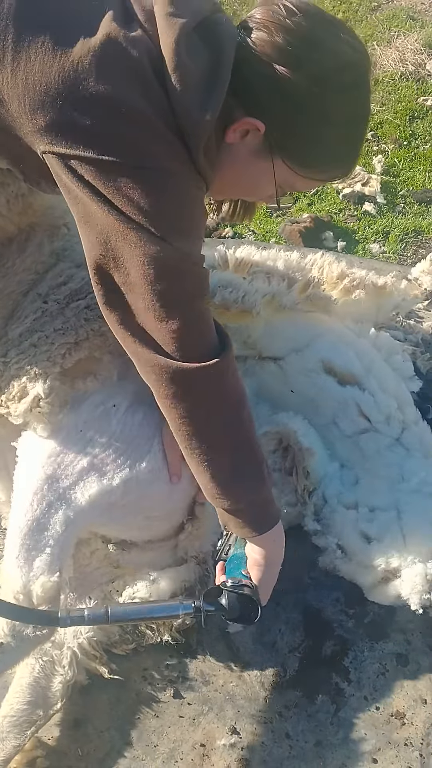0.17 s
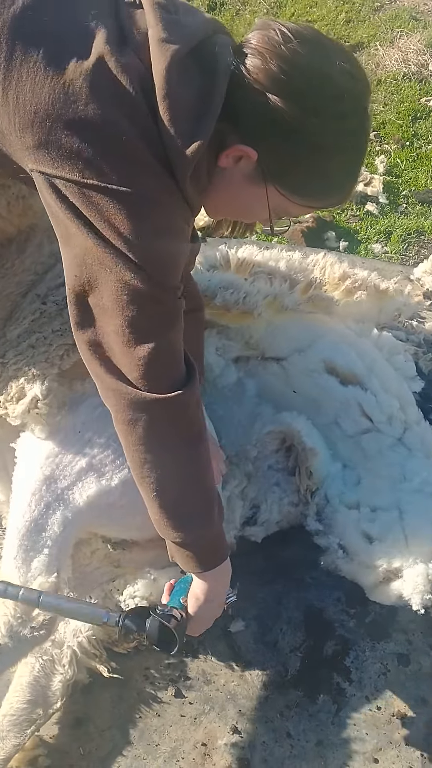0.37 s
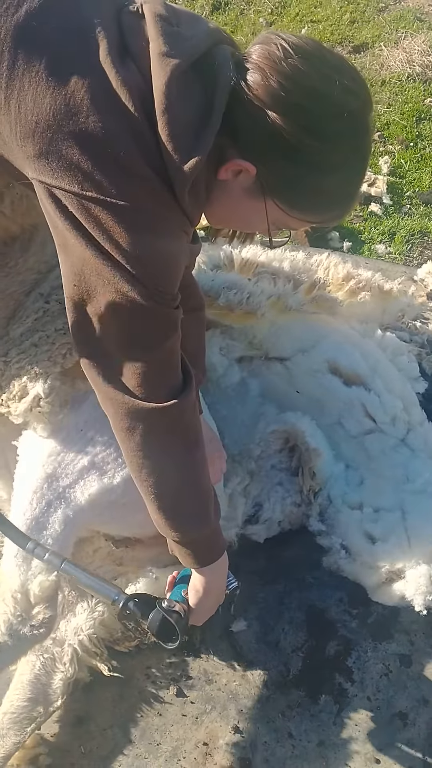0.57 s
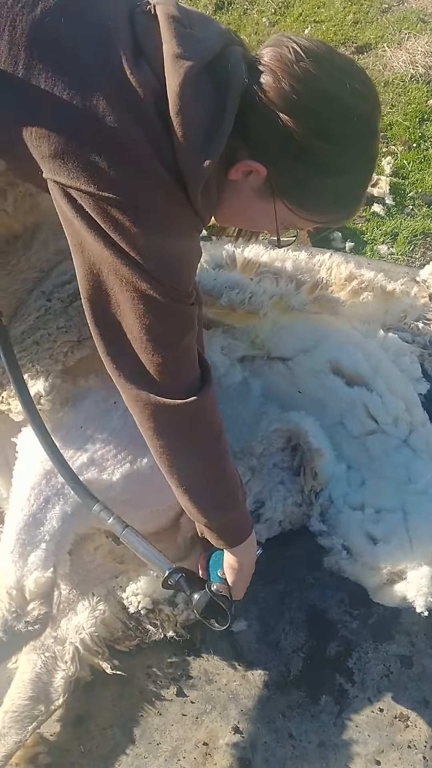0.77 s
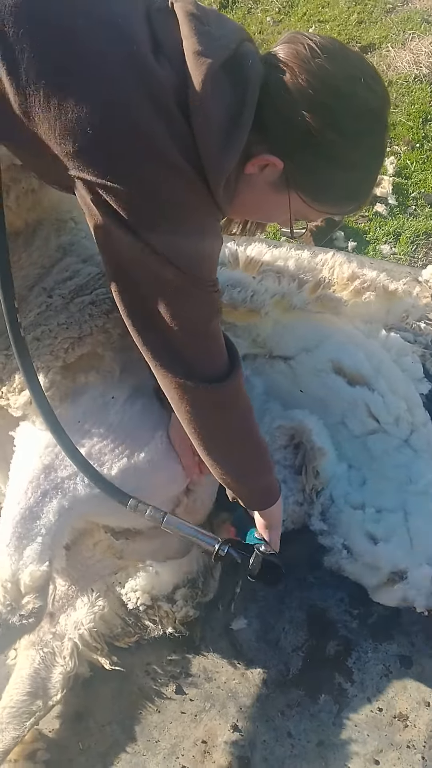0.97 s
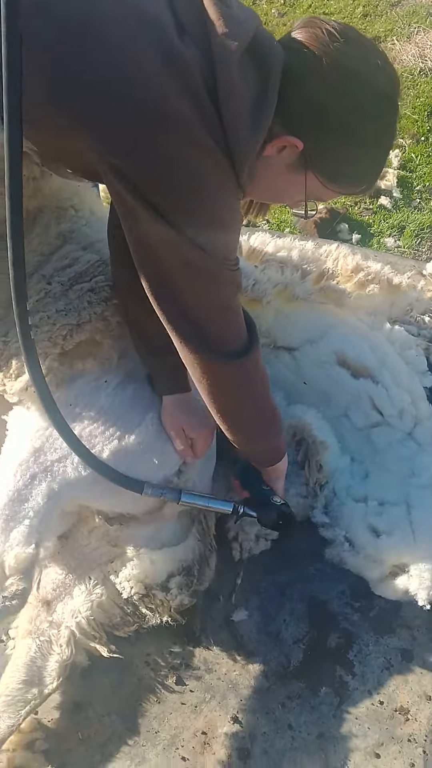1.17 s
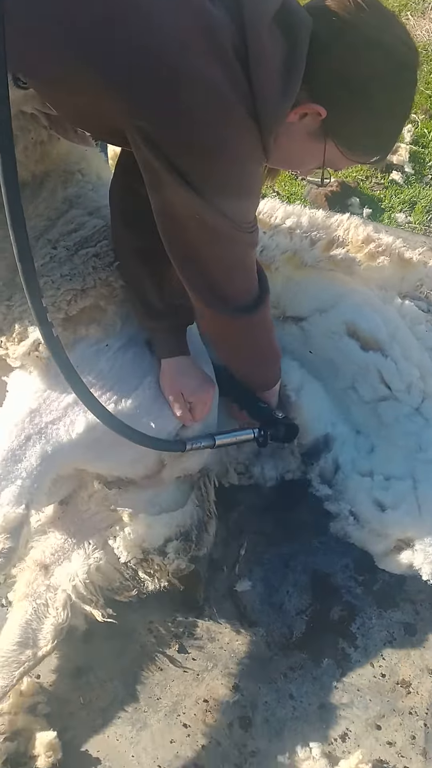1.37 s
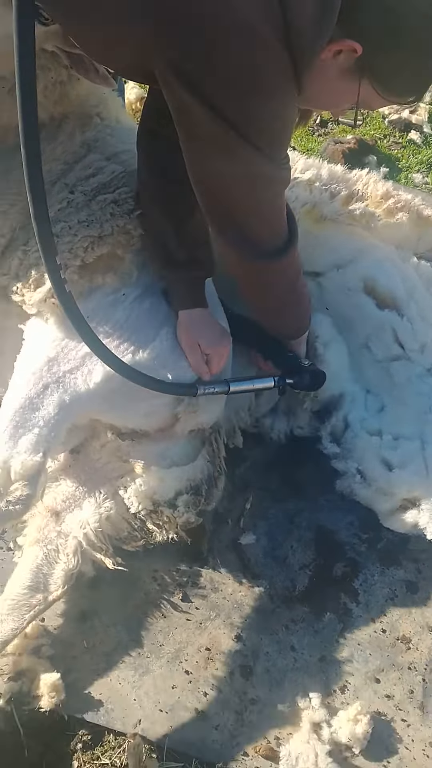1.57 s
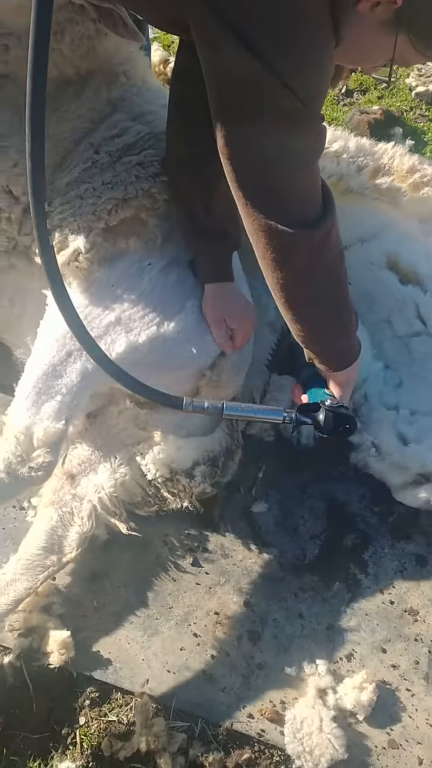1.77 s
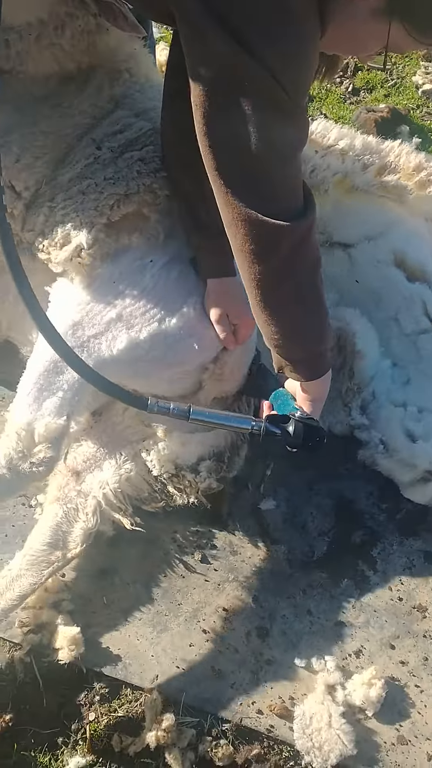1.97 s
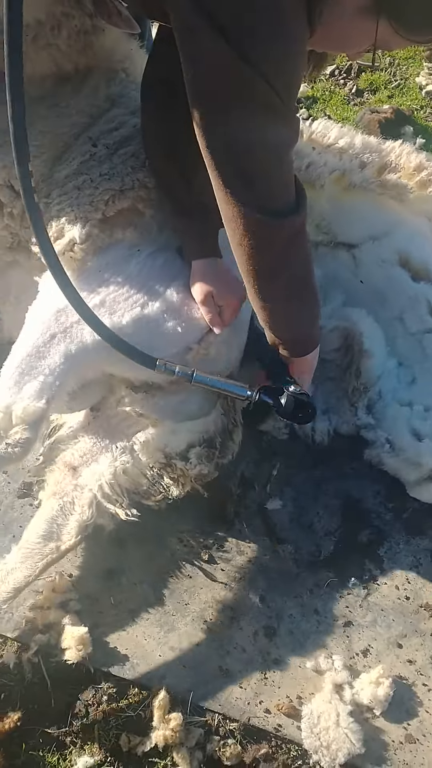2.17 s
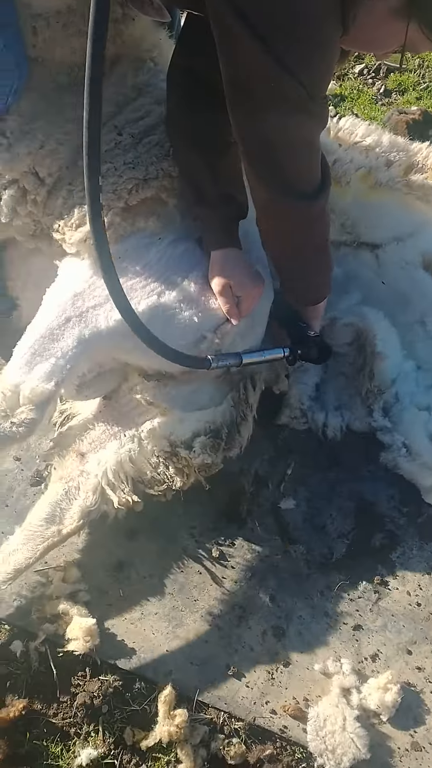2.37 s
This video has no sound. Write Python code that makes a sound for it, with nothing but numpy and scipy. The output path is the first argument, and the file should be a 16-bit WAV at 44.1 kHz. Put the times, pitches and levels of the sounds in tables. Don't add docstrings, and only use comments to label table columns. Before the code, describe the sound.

Close, bright metallic buzzing of sheep shears runs throughout, its rattle shifting as the hand moves; faint motor hum and distant small engine lie beneath, with soft low thuds mostly near the end.

```python
import sys
import numpy as np
from scipy import signal
from scipy.io import wavfile

SR = 44100
rng = np.random.default_rng(int(sys.argv[2]) if len(sys.argv) > 2 else 0)


def generate_wav(signal):
    frames = np.transpose(np.atleast_2d(signal))
    scaled = np.clip(frames, -1, 1) * 32767
    pcm = np.round(scaled).astype(np.int16)
    wavfile.write(sys.argv[1], SR, pcm)


def invert_db(level):
    return 10 ** (np.asarray(level, dtype=float) / 20)


N = 111132
SHAFT_HZ = 59.42
SOUND_M_PER_S = 343
BRIGHT_FROM_HZ = 4900


def rms_one(x):
    return x / np.sqrt(np.mean(x ** 2) + 1e-20)


def in_time(rows):
    s, *columns = np.transpose(rows)
    return [np.interp(np.arange(N) / SR, s, c) for c in columns]


def drift(rate_hz):
    r = np.exp(-80 * np.pi * rate_hz / SR)
    chance = rng.standard_normal(N // 40 + 2002)
    slow = signal.lfilter([1], [1, -2 * r, r * r], chance)[2000:]
    return np.interp(np.arange(N) / 40, np.arange(len(slow)), rms_one(slow))


def band(x, low, high):
    sos = signal.butter(2, [low, min(high, .45 * SR)], "band", fs=SR, output="sos")
    return signal.sosfilt(sos, x)


def high_pass(x, hz, run=signal.sosfilt):
    return run(signal.butter(2, hz, "high", fs=SR, output="sos"), x)


def banded_noise(spectrum, patchy_db, fast_db):
    hz, db = np.transpose(spectrum)
    edges = hz[0] * 2 ** np.arange(0, np.log2(hz[-1] / hz[0]) + .3, 1 / 3)
    white = rng.standard_normal((2, N))
    out = 0
    for k, (low, high) in enumerate(zip(edges, edges[1:])):
        level_db = np.interp(np.log(low * high) / 2, np.log(hz), db)
        flicker_db = patchy_db * drift(1.7) + fast_db * drift(36)
        out = out + invert_db(level_db + flicker_db) * band(white[k % 2], low, high)
    return rms_one(out)


def tone(turns, db, wobble_db):
    return np.sqrt(2) * invert_db(db + wobble_db * drift(3.5)) * np.cos(2 * np.pi * turns)


# (time [s], path to the engine shorter by [m])
SWAY = [(0, -.05), (.63, .24), (.9, .26), (1.35, .11), (1.65, -.18), (1.9, -.21), (2.15, -.09), (2.52, -.1)]
# (frequency [Hz], level [dB per Hz])
RUMBLE = [(25, -36), (60, -13), (110, -6), (200, -1), (450, -8), (850, -2.5), (1200, -7.5), (1700, -3),
          (2200, -13.5)]
# (multiple of the engine rate [1], level [dB])
ENGINE_ORDERS = [(2, -56), (3, -56.5), (4, -58.5), (5, -40), (6, -43.5), (7, -50), (8, -49), (10, -52),
                 (12, -59), (14, -64), (15, -62.5), (16, -64)]


def engine():
    engine_hz, first_firing_s = 37.83, .0045
    wall_echo_s, wall_echo_share = .0101, .45
    heard_s = np.arange(N) / SR + in_time(SWAY)[0] / SOUND_M_PER_S
    turns = engine_hz * (heard_s - first_firing_s)
    out = invert_db(-41.5) * banded_noise(RUMBLE, patchy_db=1.3, fast_db=1.2)
    for k, db in ENGINE_ORDERS:
        echo = 1 + wall_echo_share * np.exp(-2j * np.pi * k * engine_hz * wall_echo_s)
        out = out - tone(k * turns + np.angle(echo) / (2 * np.pi), db, wobble_db=1.3)
    return out


# (time [s], decay [s], level [dB], first pitch [Hz])
BUMPS = [
    (0.817, 0.034, -44, 115),
    (1.0, 0.027, -55, 95),
    (1.893, 0.045, -36, 125),
    (2.134, 0.02, -31, 125),
    (2.187, 0.029, -41.5, 122),
    (2.225, 0.025, -43, 88),
    (2.29, 0.0218, -42, 101),
]


def bumps():
    rise_s, sag_per_s, rough_db = .014, 7, 1.5
    out = 0
    for s, decay, db, hz in BUMPS:
        age = np.maximum(np.arange(N) / SR - s, 0)
        turns = hz / sag_per_s * (1 - np.exp(-sag_per_s * age))
        shape = (1 - np.exp(-age / rise_s)) * np.exp(-(age / decay) ** 2 / 2)
        level = np.sqrt(2) * invert_db(db + rough_db * drift(30.0))
        out = out + level * shape * np.sin(2 * np.pi * turns)
    return out


# (time [s], slot tone [dB], upper side tone [dB])
WHINE = [(0, -51, -50), (.7, -51, -49), (.9, -49, -48), (1.15, -46, -51), (1.35, -44, -52), (1.6, -42, -53),
         (1.9, -40.5, -56), (2.2, -42, -54), (2.52, -42, -55)]
LOWER_SIDE_DB = [-47.5, -55.5]
# (multiple of the shaft rate [1], level [dB])
SHAFT_ORDERS = [(4, -64.5), (6, -55.5), (12, -76.5), (13, -71), (14, -56.5), (16, -59.5), (18, -67),
                (24, -69)]


def motor():
    slot_hz, mains_hum_hz, hum_start_turns = 1249.25, 120, .44
    t = np.arange(N) / SR
    near = t + in_time(SWAY)[0] / SOUND_M_PER_S / 3
    slot_db, upper_db = in_time(WHINE)
    out = tone(mains_hum_hz * t + hum_start_turns, -50.5, wobble_db=1.2)
    for k, db in zip([0, 1, -1, -2], [slot_db, upper_db, *LOWER_SIDE_DB]):
        out = out + tone((slot_hz + k * mains_hum_hz) * near + rng.random(), db, wobble_db=.7)
    for k, db in SHAFT_ORDERS:
        turns = k * SHAFT_HZ * t + rng.random() + .015 * k * drift(3.7)
        out = out + tone(turns, db, wobble_db=4.5)
    return out


# (time [s], length [s], pitch [Hz], level [dB])
SQUEAKS = [
    (0.54, 0.08, 6800, -45),
    (0.56, 0.06, 6000, -46),
    (1.557, 0.2, 2775, -49),
    (2.002, 0.076, 6100, -45),
    (2.175, 0.01, 5700, -37),
]


def squeaks():
    half_width = .04
    t = np.arange(N) / SR
    out = 0
    for s, length, hz, db in SQUEAKS:
        swell = np.exp(-((t - s) / length) ** 2)
        sing = band(rng.standard_normal(N), hz * (1 - half_width), hz * (1 + half_width))
        out = out + invert_db(db) * swell * rms_one(sing)
    return out


# (time [s], path to the microphone longer by [m])
REACH = [(0, -.45), (.3, 0), (.75, .15), (1.1, -.15), (1.35, -.3), (1.6, -.75), (1.8, -.35), (1.97, 0),
         (2.25, -.05), (2.52, -.3)]


def contact(place, hz, width_hz, db, decay_ms, repeats=0.052):
    jitter_ms, spread_db, drift_db = .1, 1.2, .6
    turns = np.arange(int(N / SR * 60) - 1)
    chance = np.clip(rng.standard_normal((len(turns), 2)), -2, 2)
    s = (turns + place) / SHAFT_HZ
    travel_s = np.interp(s, *np.transpose(REACH)) / SOUND_M_PER_S
    heard_s = s + travel_s + jitter_ms / 1000 * chance[:, 0]
    at = np.clip(heard_s * SR, 0, N).astype(int)
    clicks = np.zeros(N + 1) + 1e-18
    clicks[at] = invert_db(spread_db * chance[:, 1])
    clicks = clicks[:N]
    sample = np.arange(N)
    age = sample - np.maximum.accumulate(sample * (clicks > 1e-9))
    r = np.exp(-2000 / decay_ms / SR)
    burst = signal.lfilter([1], [1, -2 * r, r * r], clicks)
    low, high = hz - width_hz / 2, hz + width_hz / 2
    rough = rms_one(band(burst * rng.choice([-1, 1], N), low, high))
    same = rms_one(band(burst * np.sin(2 * np.pi * hz * age / SR), low, high))
    return invert_db(db + drift_db * drift(1.7)) * (np.sqrt(1 - repeats) * rough + np.sqrt(repeats) * same)


# (middle time [s], half length [s], place in turn [0-1], frequency [Hz], level [dB])
CHATTER = [(0.19, 0.19, 0.7, 1600, -47), (0.66, 0.22, 0.7, 1665, -45), (1.32, 0.33, .82, 1570, -45),
           (2.1, 0.055, 1, 2100, -51), (2.45, .1, 0.9, 1640, -46.5), (0.3, 0.096, .56, 2750, -50),
           (1, 0.11, .93, 2300, -54), (1.38, 0.42, 0, 2750, -49), (1.3, 0.26, 0.5, 2790, -46.5),
           (1.65, .07, 0.7, 4600, -45), (2.15, 0.36, 0.1, 2770, -46), (2.1, 0.3, 0.7, 2500, -50),
           (.9, 0.11, .22, 3400, -45.5), (1.05, 0.1, 0.3, 3800, -49.5), (1.66, 0.53, 0.9, 3450, -51.5),
           (2.06, 0.38, 0, 3230, -50.5), (2.11, 0.21, 0.8, 3800, -47), (1.9, 0.098, 0.1, 4950, -43),
           (1.87, 0.043, .54, 4950, -38.5), (2.2, .12, 0.4, 4950, -46.5), (1.47, 0.1, .88, 6000, -47.5),
           (1.6, .07, .35, 6000, -44.5)]


def chatter():
    t = np.arange(N) / SR
    out = 0
    for s, length, place, hz, db in CHATTER:
        swell = np.exp(-((t - s) / length) ** 4)
        out = out + swell * contact(place, hz, .28 * hz, db, decay_ms=1.7, repeats=.7)
    return out


# (time [s], blade pressure [dB], comb ring [dB], crank knock [dB], cutter clack [dB])
HAND = [(0, -35, -42, -54, -53.5), (.22, -34.5, -43, -52, -44), (.34, -35.5, -36, -44.5, -54),
        (.45, -35.5, -43, -56, -56), (.56, -33, -48, -46, -61), (.7, -35.5, -46, -38.5, -59),
        (.78, -35, -52, -42, -58), (.97, -37.5, -41.5, -45, -49), (1.1, -36.5, -55, -52, -50),
        (1.45, -37.5, -58, -65, -45.5), (1.6, -40.5, -57, -66, -45), (1.8, -35.5, -55, -49, -58),
        (1.86, -37, -50, -46, -55), (1.96, -34.5, -48, -43, -52.5), (2.22, -34.5, -51.5, -45, -45.5),
        (2.28, -38, -46, -49, -55), (2.39, -38, -65, -47, -40), (2.52, -40.5, -58.5, -56, -40.5)]
# (frequency [Hz], level [dB per Hz])
SLIDE = [(820, -37), (1400, -7.5), (1900, -6), (2060, -4.5), (2740, -4.5), (3800, -4.5), (6300, -3.5),
         (7500, -7.5), (8050, -28), (10800, -50.5), (18300, -120)]
# (place in turn [0-1], frequency [Hz], width [Hz], level [dB], decay [ms])
TEETH = [(.22, 3300, 700, -12, 2.7), (0.89, 6120, 1120, 3, 2.2), (.13, 6860, 960, 0, 2.9),
         (0.45, 6800, 2100, 1, 4), (0.82, 7200, 1400, 2, 2.2), (0.5, 5190, 920, -9, 1.8)]
KNOCK = (.84, 2200, 1100, 0, 1.5)
CLACK = (.84, 4800, 3400, 0, 1.6)
RING_PLACES = [.25, .42, .58, .78]


def sliding(swing_db):
    stroke_db, stroke_place, shudder_db = 1.2, .92, .6
    hiss = banded_noise(SLIDE, patchy_db=.5, fast_db=1)
    heard_s = np.arange(N) / SR - in_time(REACH)[0] / SOUND_M_PER_S
    stroke = np.cos(4 * np.pi * (SHAFT_HZ * heard_s - stroke_place))
    hiss = hiss * invert_db(stroke_db * stroke + shudder_db * drift(40.0))
    bright = high_pass(hiss, BRIGHT_FROM_HZ, signal.sosfiltfilt)
    brightened = hiss + (invert_db(1.1 * swing_db) - 1) * bright
    return invert_db(-34.5 + .17 * swing_db) * brightened


def handpiece():
    press_db, ring_db, knock_db, clack_db = in_time(HAND)
    mean_db = press_db.mean()
    swing_db = press_db - mean_db
    out = sliding(swing_db)
    for row in TEETH:
        follows = row[1] > BRIGHT_FROM_HZ
        out = out + invert_db(mean_db + follows * swing_db - 10) * contact(*row)
    for place in RING_PLACES:
        out = out + invert_db(ring_db - 4.5) * contact(place, hz=4940, width_hz=220, db=0, decay_ms=4)
    out = out + invert_db(knock_db - .5) * contact(*KNOCK, repeats=.45)
    return out + invert_db(clack_db + 1.5) * contact(*CLACK, repeats=.26)


def scene():
    return (engine() + bumps() + motor() + squeaks() + chatter() + handpiece())[None]


def low_pass(x):
    return signal.sosfilt(signal.butter(12, 8660, fs=SR, output="sos"), x)


def record(dry):
    low_cut = high_pass(dry, 27)
    top_cut = signal.cheby2(12, 62, 8940, fs=SR, output="sos")
    mix = signal.sosfilt(top_cut, low_cut)
    return low_pass(mix)


dry = scene()
out = record(dry)
generate_wav(out)
```